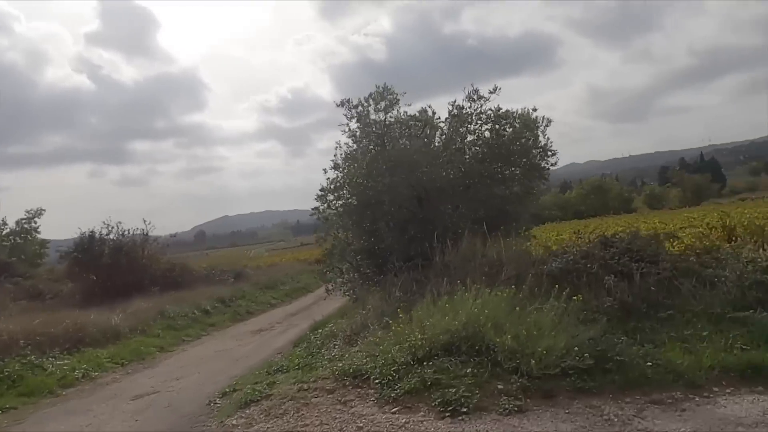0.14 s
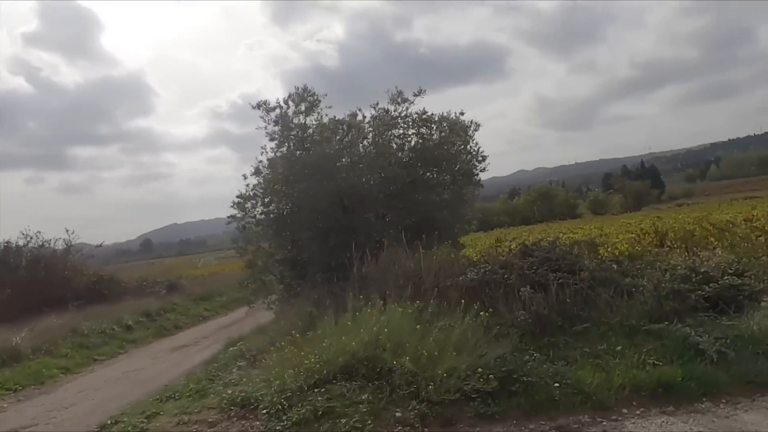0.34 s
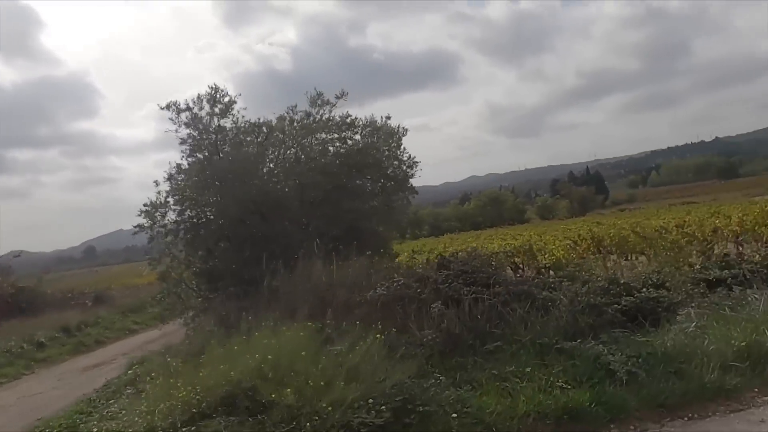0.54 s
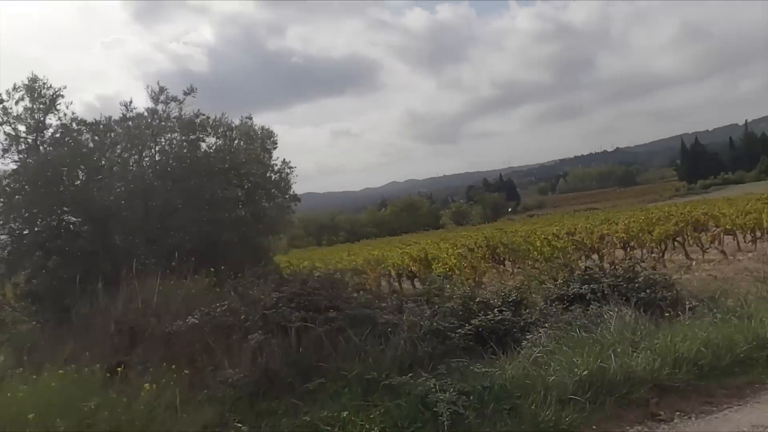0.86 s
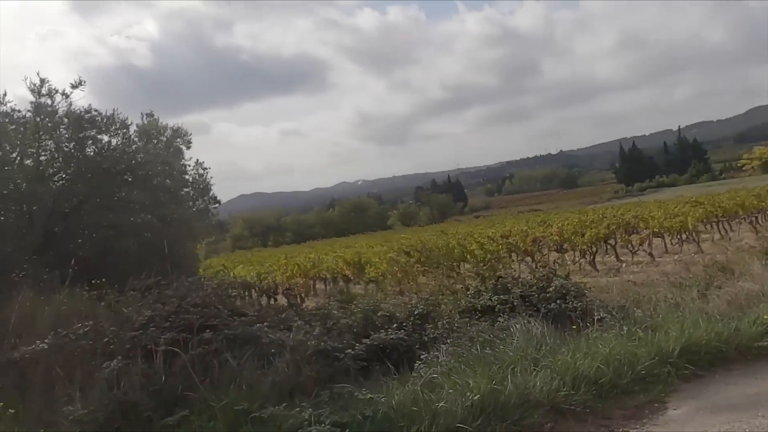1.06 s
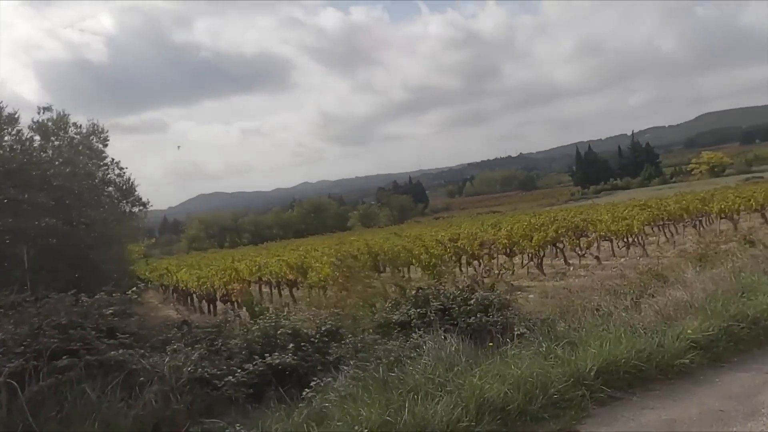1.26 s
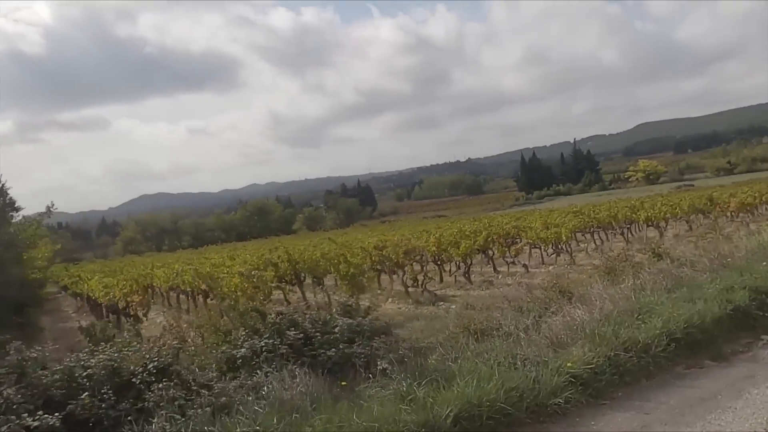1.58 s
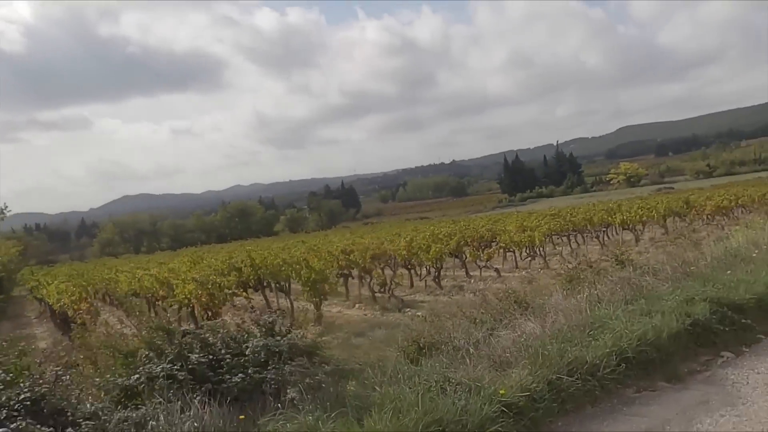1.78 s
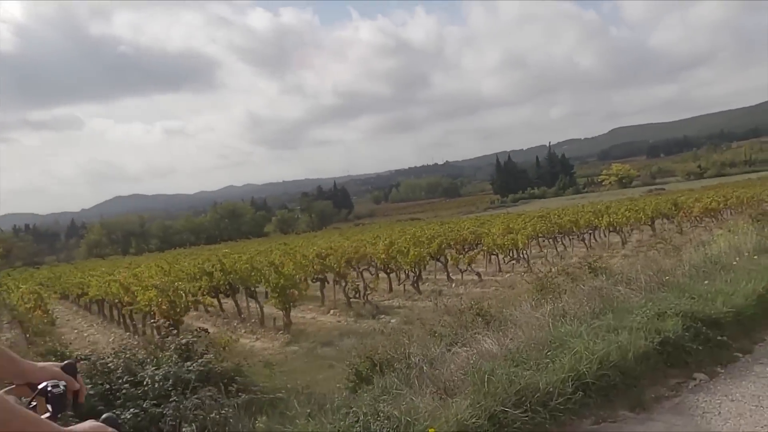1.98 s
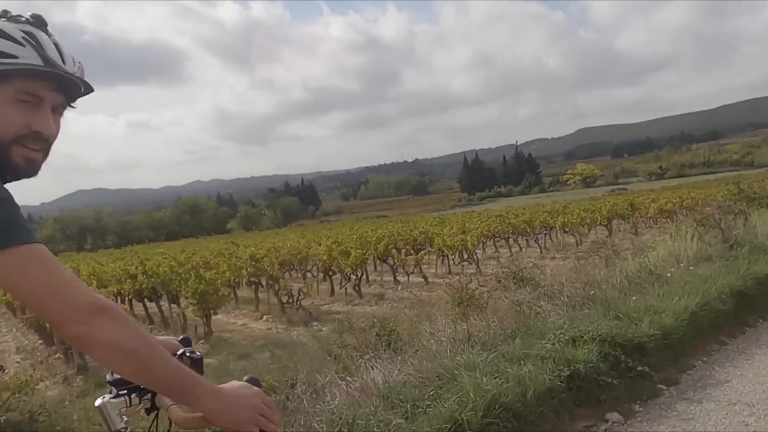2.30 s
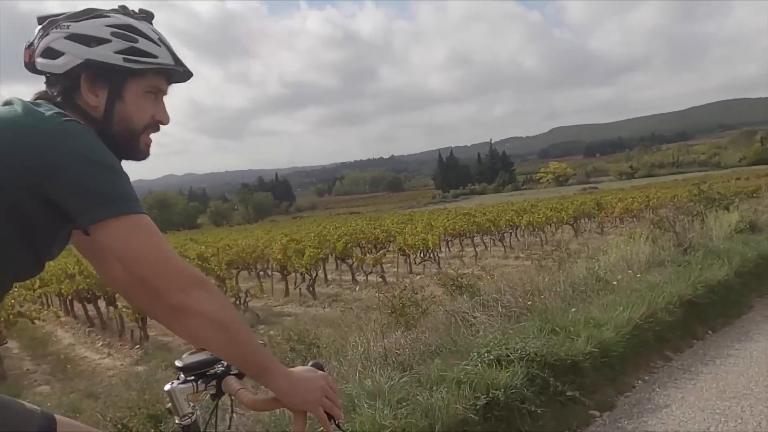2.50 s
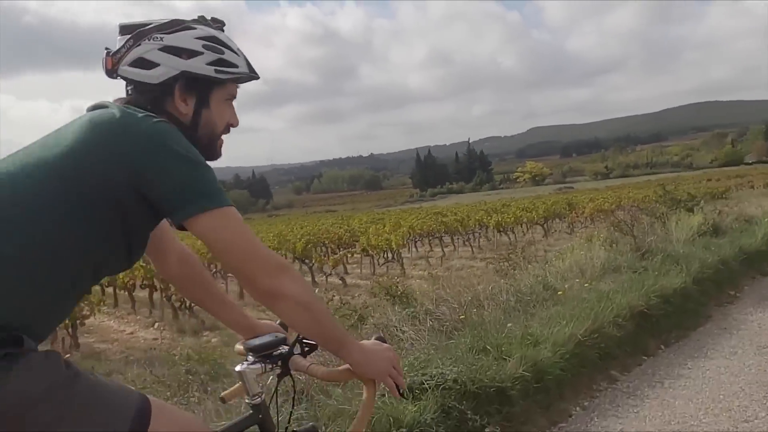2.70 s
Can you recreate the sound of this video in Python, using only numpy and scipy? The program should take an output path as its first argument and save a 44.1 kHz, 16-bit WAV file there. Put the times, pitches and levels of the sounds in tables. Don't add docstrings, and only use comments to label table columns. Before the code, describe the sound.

A coasting bicycle's freewheel buzzes throughout, about forty metallic ticks a second, brightening and coming nearer until about 2.2 s. Tyres grind grit, with stone knocks and a sharp crack near 0.4 s, more clatter at 0.75-1 s, and pops near 1.2, 1.55 and 2.1 s. Wind rumbles and thumps the microphone strongly around 0.3-0.5 s, eases mid-way, then gusts again after 2.3 s. Open air, dry and close.

```python
import sys
import numpy as np
from scipy import signal
from scipy.io import wavfile

SR = 44100
rng = np.random.default_rng(int(sys.argv[2]) if len(sys.argv) > 2 else 0)


def elevation(decibels):
    levels = np.asarray(decibels, float)
    return 10 ** (levels / 20)


def transcribe(signal):
    frames = np.atleast_2d(signal).T
    limited = np.clip(frames, -1, 1)
    pcm = np.round(limited * 32767).astype(np.int16)
    wavfile.write(sys.argv[1], SR, pcm)


N = 125685


def evened(x):
    return x / np.sqrt(np.mean(x ** 2) + 1e-20)


def along(rows):
    s, value = np.transpose(rows)
    return np.interp(np.arange(N) / SR, s, value)


def coloured(x, spectrum):
    f, db = np.transpose(spectrum)
    hz = np.abs(np.fft.fftfreq(8192, 1 / SR))
    gain_db = np.interp(np.log(hz + 1), np.log(f + 1), db, left=db[0] - 26, right=db[-1] - 61.5)
    log_gain = gain_db * np.log(10) / 20
    taps = np.fft.ifft(np.exp(np.conj(signal.hilbert(log_gain)))).real[:4096]
    return evened(signal.oaconvolve(x, taps)[:len(x)])


def resonate(x, hz, width):
    r = np.exp(-np.pi * width / SR)
    return 2 * signal.lfilter([1 - r], [1, -r * np.exp(2j * np.pi * hz / SR)], x).real


def ring(x, hz, width):
    turn = np.exp(2j * np.pi * np.cumsum(hz) / SR)
    wide, narrow = np.exp(-np.pi * width / SR * np.array([4, 1]))
    smooth = signal.lfilter([(1 - wide) * (1 - narrow)], np.poly([wide, narrow]), x / turn)
    return 4 * (turn * smooth).real


def wander(rate_hz):
    lowpass = signal.butter(2, rate_hz, fs=SR, output="sos")
    return evened(signal.sosfilt(lowpass, rng.standard_normal(N)))


def sparse(per_s, spread_db):
    size = elevation(spread_db * np.minimum(rng.exponential(1, N), 4))
    return size * (rng.random(N) < per_s / SR) * rng.choice([-1., 1.], N)


def add(mix, s, sound):
    part = mix[round(s * SR):][:len(sound)]
    part += sound[:len(part)]


# start_s, level_db
RATCHET_TICKS = [(0.0017, -29), (0.0293, -42), (0.0572, -33), (0.0857, -30), (0.1133, -36), (0.1425, -31),
                 (0.1713, -36), (0.2014, -39), (0.2318, -36), (0.262, -33), (0.2868, -35), (0.3116, -42),
                 (0.3375, -39), (0.36, -39), (0.3828, -36), (0.4046, -37.5), (0.429, -33), (0.454, -34.5),
                 (0.4786, -33.5), (0.5025, -35), (0.5276, -31), (0.556, -40), (0.5827, -45), (0.609, -47),
                 (0.6376, -41.5), (0.6653, -36), (0.692, -35), (0.7179, -37), (0.743, -30.5), (0.7707, -49),
                 (0.797, -38), (0.8209, -44), (0.843, -34), (0.866, -28.5), (0.8865, -35), (0.9091, -38.5),
                 (0.9328, -31), (0.9545, -31.5), (0.9766, -32), (0.999, -32),
                 (1.0209, -33), (1.0446, -29.5), (1.069, -33.5), (1.0928, -30.5), (1.1168, -37),
                (1.1415, -32), (1.169, -34.5), (1.1957, -34.5), (1.222, -33.5), (1.247, -38), (1.272, -34),
                (1.2993, -34.5), (1.3233, -33), (1.3477, -30.5), (1.3717, -36), (1.3942, -36.5),
                (1.4176, -36.5), (1.4405, -35.5), (1.464, -36), (1.489, -42), (1.5152, -37.5),
                (1.5392, -28), (1.5625, -31), (1.5865, -32.5), (1.609, -30), (1.6303, -33.5),
                (1.654, -37.0), (1.676, -34), (1.6975, -32.5), (1.717, -37.0), (1.7398, -38), (1.761, -39),
                (1.7822, -33), (1.8059, -42), (1.8284, -39.5), (1.852, -35), (1.877, -34), (1.901, -41),
                (1.924, -31.5), (1.9468, -35), (1.97, -36), (1.9934, -37.5), (2.0172, -39),
                 (2.0393, -41), (2.062, -39), (2.0841, -32.0), (2.1072, -28), (2.1283, -30.5), (2.1496, -32.5),
              (2.1718, -34.5), (2.1937, -35.5), (2.2136, -37), (2.2336, -34.5), (2.255, -37), (2.2743, -42),
              (2.297, -48), (2.318, -51), (2.3379, -40), (2.357, -38), (2.3788, -33.5), (2.4007, -33.0),
              (2.4225, -35), (2.445, -35.5), (2.4663, -31.5), (2.489, -35.0), (2.5117, -36), (2.535, -40),
              (2.5587, -31), (2.585, -32), (2.6125, -30), (2.6379, -29.5), (2.662, -36), (2.6862, -32),
              (2.7076, -33), (2.7269, -30.5), (2.7438, -34), (2.7626, -31.5), (2.781, -37), (2.7985, -35),
              (2.8172, -32.5), (2.8348, -36.5)]
# pitch_hz, width_hz, level_db, nearness_db (extra when nearest)
HUB_RINGS = [(2827, 420, -2, 4.5), (3160, 47, 4, 2), (3500, 403, 0, 0), (3940, 274, -0.5, 0),
             (4470, 270, -3.5, 2), (4960, 580, -15, -4), (6150, 720, -12, -0.5), (6670, 190, -14, 5),
             (8130, 880, -14, 5.5), (8640, 520, -11.5, 5.5), (9380, 270, -11.5, 8),
             (10300, 720, -19.5, 10.5), (11890, 660, -20.5, 14), (13700, 1000, -37, 11)]


def freewheel():
    nearest_s, rattle_db = 2.18, -17.5
    ring_spread_db, pitch_spread = 3, 0.015
    start_s, tick_db = np.transpose(RATCHET_TICKS)
    draws = rng.standard_normal((len(start_s), len(HUB_RINGS), 2))
    level_draw, pitch_draw = draws.transpose(2, 0, 1)
    at = np.round(start_s * SR).astype(int)

    t = np.arange(1500) / SR
    rise = 1 - np.exp(-t / 0.00089)
    snap = rise * (np.exp(-t / 0.0029) + 0.6 * np.exp(-t / 0.01))

    tooth = np.clip(np.searchsorted(at, np.arange(N)) - 1, 0, None)
    near = np.clip(np.arange(N) / SR / nearest_s, 0.35, 1) ** 2
    out = np.zeros(N)
    for k, (hz, width, db, near_db) in enumerate(HUB_RINGS):
        follow = 0.87 if hz < 5500 else 0.17
        hits = np.zeros(N)
        hits[at] = elevation((tick_db + 34.5) * follow + ring_spread_db * level_draw[:, k])
        rattle = elevation(rattle_db + (5 if hz > 11000 else 0))
        scrape = np.tanh(0.83 * rng.standard_normal(N))
        drive = (signal.oaconvolve(hits, snap)[:N] + rattle) * scrape
        pitch_hz = hz * (1 + pitch_spread * pitch_draw[tooth, k])
        out += elevation(db + near_db * (near - 0.84)) * ring(drive, pitch_hz, width)
    return elevation(4.5 - 44) * evened(out)


# time_s, level_db
CRUNCH_LEVEL = [(0, -42.5), (.1, -46), (.3, -43.5), (.35, -37), (.5, -43.5), (.57, -48), (.65, -43.5),
                (.72, -44), (.8, -39), (.95, -44.5), (1.02, -52.5), (1.12, -41.5), (1.25, -42.5),
                (1.4, -47), (2.35, -47.5), (2.45, -46.5), (2.6, -40), (2.85, -42)]
# pitch_hz, level_db (per Hz)
GRIT_COLOUR = [(400, 5), (800, 1.5), (1600, 0), (2400, -3.5), (4500, -8.5), (7000, -22), (12000, -29),
               (15000, -47)]
# pitch_hz, width_hz, level_db
PEBBLE_RINGS = [(739, 245, -4), (1150, 280, -8), (1570, 450, -3), (1940, 590, -8.5), (2520, 250, -9)]


def grit():
    clumps = elevation(1.6 * wander(23.0))
    grains = evened(sparse(1800, -5.5) * clumps)
    hiss = elevation(7.5) * rng.standard_normal(N)
    out = coloured(grains + hiss, GRIT_COLOUR)
    for hz, width, db in PEBBLE_RINGS:
        taps = sparse(120, 2.9) * clumps
        pebble = resonate(resonate(taps, hz, width), hz, 2 * width)
        out += elevation(db - 4.5) * evened(pebble)
    return out * elevation(along(CRUNCH_LEVEL))


# start_s, peak_db, pitch_hz, decay_s
STONE_KNOCKS = [(0.021, -27.5, 1070, 0.0044), (0.324, -21.5, 880, 0.0072), (0.33, -18.5, 865, 0.0031),
                (0.357, -20, 870, 0.0025), (0.372, -34, 760, 0.0023), (0.435, -28, 1150, 0.0014),
                (0.462, -25, 600, 0.0012), (0.5, -26.5, 1210, 0.0031), (0.51, -27.5, 880, 0.0045),
                (0.635, -28.5, 1650, 0.0099), (0.77, -28.5, 1290, 0.0032), (0.787, -29.5, 786, 0.0055),
                (0.796, -21.5, 800, 0.0022), (0.848, -21, 1360, 0.0029), (0.931, -31, 1320, 0.0061),
                (0.959, -30, 1590, 0.0041), (1.154, -34, 680, 0.0049), (1.213, -29, 1280, 0.0033),
                (1.235, -29, 1670, 0.0047), (1.956, -29.5, 840, 0.0065), (2.094, -31, 891, 0.0043),
                (2.119, -19, 1810, 0.0018), (2.276, -36, 1110, 0.015), (2.453, -27, 1480, 0.0067),
                (2.574, -24.5, 805, 0.0031), (2.634, -23, 1170, 0.0023), (2.668, -28, 940, 0.0037),
                (2.736, -23, 1300, 0.0044)]
# start_s, peak_db, pitch_hz, decay_s
STONE_CRACKS = [(0.4205, -13, 4400, 0.0024), (0.7718, -29, 3700, 0.0015), (0.7886, -23, 2980, 0.0026),
                (0.7988, -23, 3250, 0.0015), (0.8412, -27, 3970, 0.0027), (0.8495, -33, 5000, 0.003),
                (0.8074, -26, 3160, 0.0016), (0.835, -22, 3780, 0.0017), (0.8692, -17, 3680, 0.0017),
                (0.9858, -21, 3500, 0.001), (1.17, -17.5, 3630, 0.00045), (1.531, -35, 9400, 0.012),
                (1.5322, -23, 2550, 0.0037), (1.5389, -24, 3120, 0.0022), (1.5498, -18, 3430, 0.0056),
                (2.0937, -28, 3190, 0.0018), (2.1182, -22.5, 3600, 0.0021), (2.143, -30, 4200, 0.0036)]


def flung_stones(out, stones, relative_width, knock):
    t = np.arange(1200) / SR
    noises = rng.standard_normal((len(stones), 1200))
    for (s, db, hz, decay), noise in zip(stones, noises):
        scrape = noise * (1 - np.exp(-t / 0.0017)) * np.exp(-t / max(decay, 1e-4))
        contact = knock * elevation(db + 16) * np.exp(-t / 0.00005)
        blow = scrape - contact
        width = relative_width * hz
        body = resonate(resonate(resonate(blow, hz, width), hz, 2 * width), hz, 2 * width)
        spray = elevation(-23) * resonate(resonate(blow, 2 * hz, hz), 2 * hz, 2 * hz)
        add(out, s, elevation(db) * (body + spray) / abs(body).max())


def tyres():
    out = grit()
    flung_stones(out, STONE_KNOCKS, relative_width=0.67, knock=1.3)
    flung_stones(out, STONE_CRACKS, relative_width=0.51, knock=5.2)
    return out


# time_s, level_db
GUST_LEVEL = [(0, -19.5), (.17, -21), (.28, -15), (.53, -20), (.56, -26.5), (.66, -19.5), (.92, -25),
              (1.01, -33), (1.08, -26), (1.33, -25), (1.39, -32), (1.56, -28), (1.8, -30), (2.25, -24.5),
              (2.3, -23.5), (2.43, -27.5), (2.51, -18.5), (2.85, -20.5)]
# pitch_hz, level_db (per Hz)
RUMBLE_COLOUR = [(10, -16), (16, 1.5), (50, 2.5), (90, 1), (135, -2.5), (165, -9), (250, -14.5),
                 (400, -41.5)]
# pitch_hz, level_db (per Hz)
FLUTTER_COLOUR = [(120, -16), (190, -5.5), (300, 3.5), (450, -1.5), (700, -18), (1200, -23), (2500, -59.5)]
# start_s, peak_db, pitch_hz, cycles
CAPSULE_PUFFS = [(0.291, -14, 284, 1.56), (0.329, -8, 310, 2.4), (0.334, -33, 316, 1.9),
                 (0.396, -12, 410, 3.1), (0.438, -12.5, 282, 2.6), (0.461, -14.5, 467, 1.75),
                 (0.509, -20.5, 385, 1.6), (0.796, -27.5, 276, 2.5), (0.932, -30.5, 520, 3.3),
                 (1.15, -27.5, 490, 2.8), (1.171, -21, 110, 1.9), (1.241, -19.5, 140, 1.9),
                 (1.257, -17.5, 123, 1.55), (1.274, -23, 104, 1.6), (1.349, -16.5, 143, 1.66),
                 (2.305, -15, 85, 1.54), (2.492, -14.5, 75, 1.7), (0.223, -23, 208, 1.8),
                 (0.603, -23, 230, 1.4), (0.715, -33, 210, 1.9), (2.718, -21, 347, 2.6),
                 (2.804, -22, 342, 2), (1.956, -29, 324, 3.5), (2.534, -17, 268, 1.6),
                 (2.564, -19.5, 340, 2.4), (2.628, -14, 308, 1.43), (2.664, -22.5, 258, 2.6),
                 (2.732, -19, 323, 2.8)]


def wind():
    gust_db = along(GUST_LEVEL)
    rumble = coloured(rng.standard_normal(N), RUMBLE_COLOUR) * elevation(0.5 * wander(8.5))
    flecks = sparse(500, 3) + 0.087 * rng.standard_normal(N)
    eddies = coloured(flecks, FLUTTER_COLOUR) * elevation(2.86 * wander(16.0))
    lag_s = 0.0041
    late_gust_db = np.interp(np.arange(N) - lag_s * SR, np.arange(N), gust_db)
    eddy_db = -18 - 28 + 0.67 * (late_gust_db + 28) + 0.5 * (along(CRUNCH_LEVEL) + 50.0)
    out = elevation(gust_db) * evened(rumble) + elevation(eddy_db) * evened(eddies)
    for s, db, hz, cycles in CAPSULE_PUFFS:
        t = np.arange(0, cycles / hz, 1 / SR)
        progress = t * hz / cycles
        swell = np.sin(np.pi * progress) ** 1.7
        add(out, s, elevation(db) * swell * np.sin(2 * np.pi * hz * t * (1 - 0.14 * progress)))
    return out


def scene():
    return (freewheel() + tyres() + wind())[None]


def low_pass(x):
    return signal.sosfilt(signal.butter(12, 15400, fs=SR, output="sos"), x)


def record(dry):
    ceiling, edge_hz, sag_hz = 0.43, 15300, 750
    limited = ceiling * np.tanh(dry / ceiling)
    corners_hz = [0, 12500, 13300, edge_hz, edge_hz + 300, SR / 2]
    rolloff = signal.firwin2(255, corners_hz, [1, 0.94, 0.78, 0.42, 0, 0], fs=SR)
    x = signal.oaconvolve(limited, rolloff[None], "same")
    hz, t, z = signal.stft(x, SR, nperseg=1024)
    top_hz = edge_hz - sag_hz * abs(np.interp(t, np.arange(N) / SR, wander(9)))
    mix = signal.istft(z * (hz[:, None] < top_hz), SR, nperseg=1024)[1][:, :N]
    return low_pass(mix)


dry = scene()
out = record(dry)
transcribe(out)
```